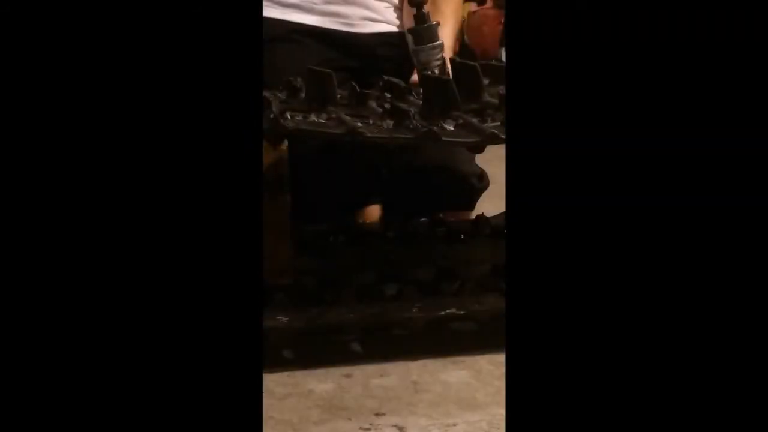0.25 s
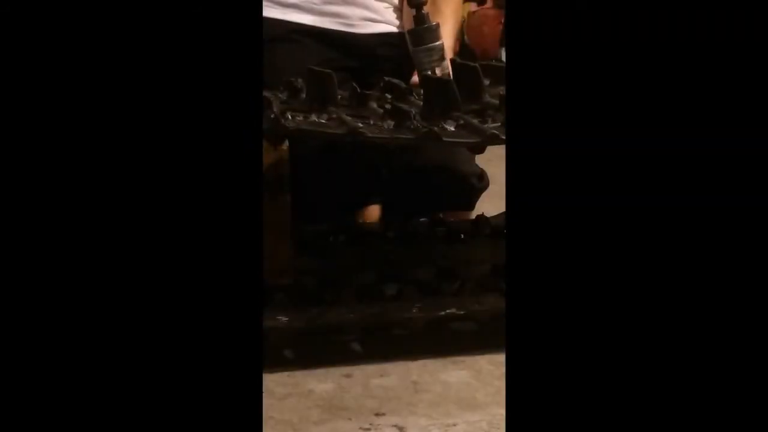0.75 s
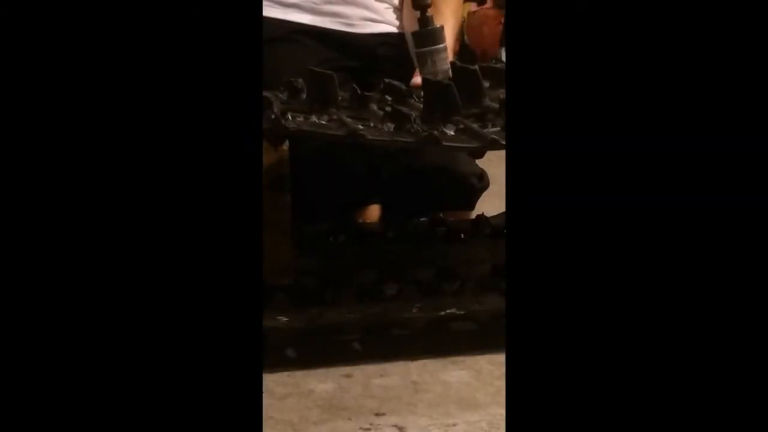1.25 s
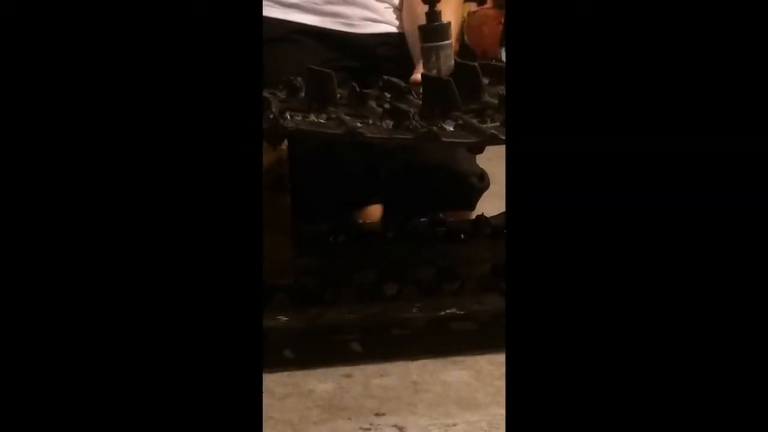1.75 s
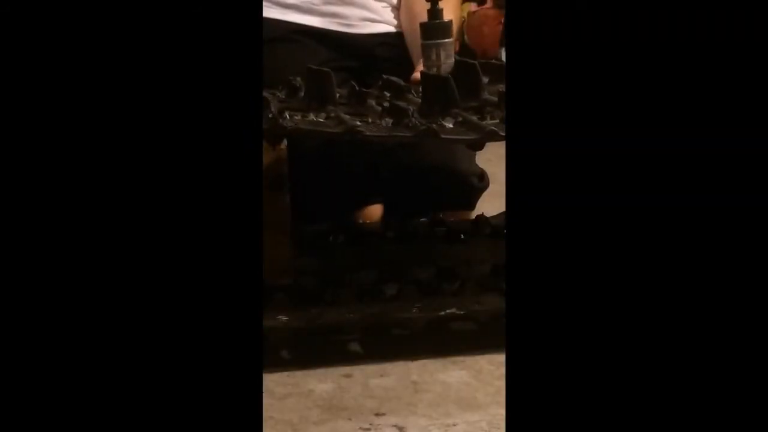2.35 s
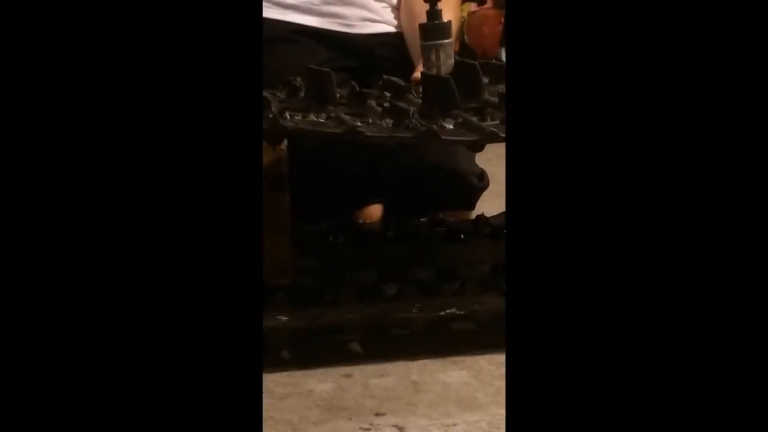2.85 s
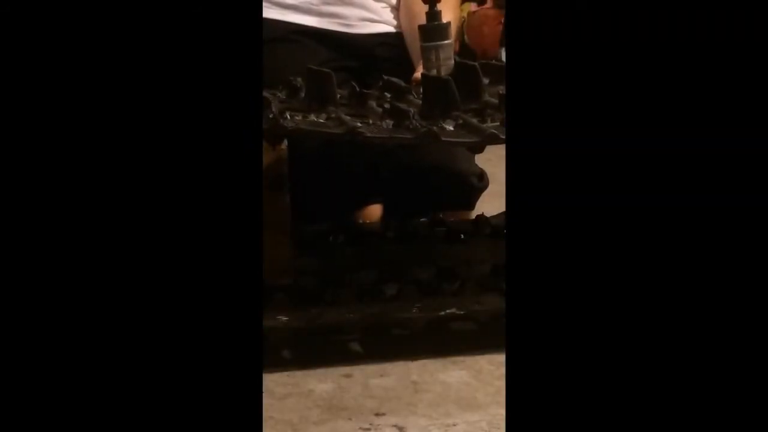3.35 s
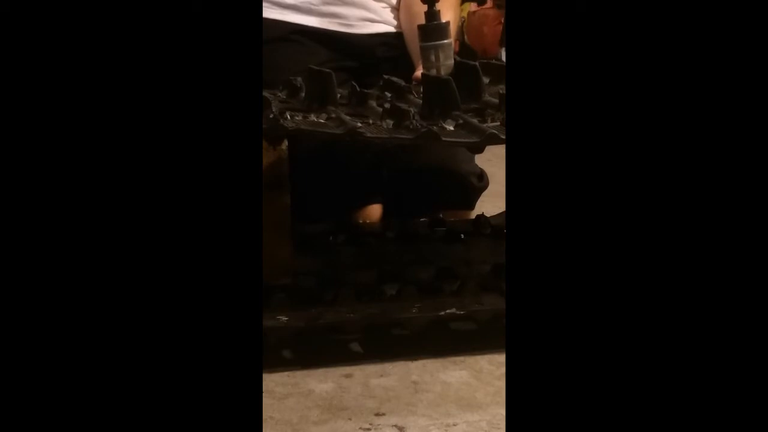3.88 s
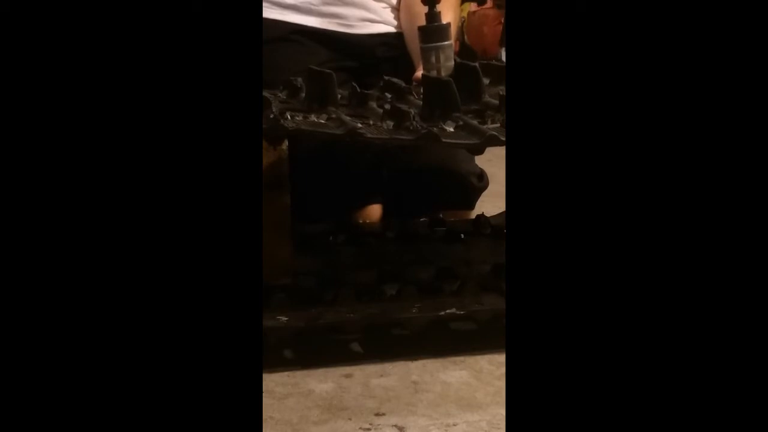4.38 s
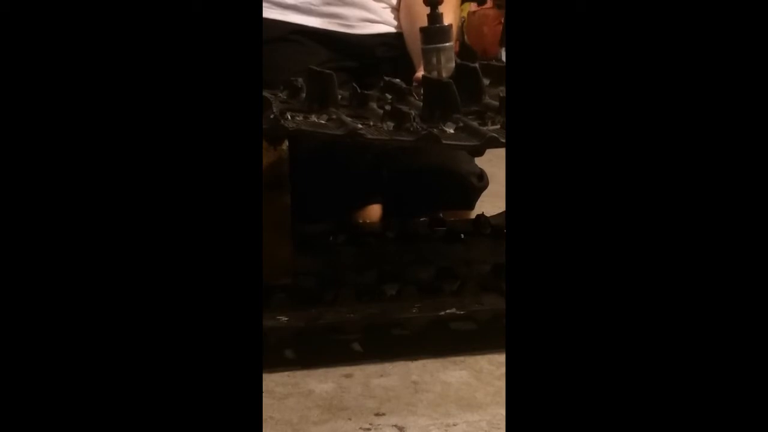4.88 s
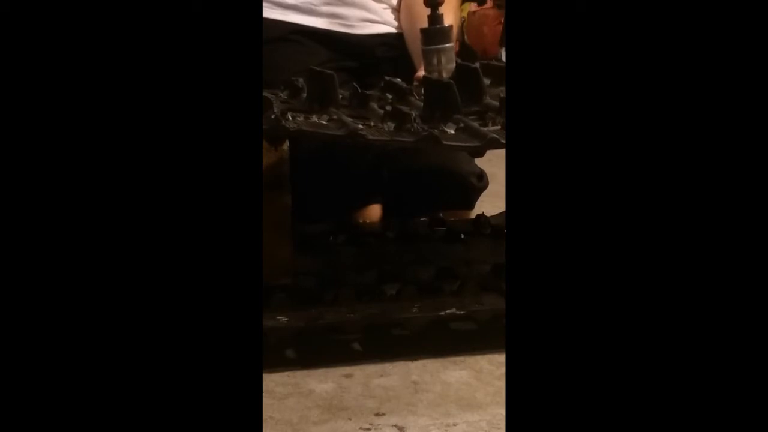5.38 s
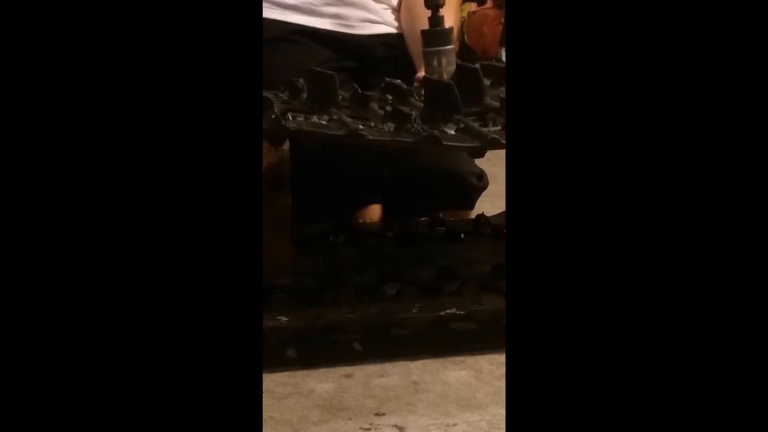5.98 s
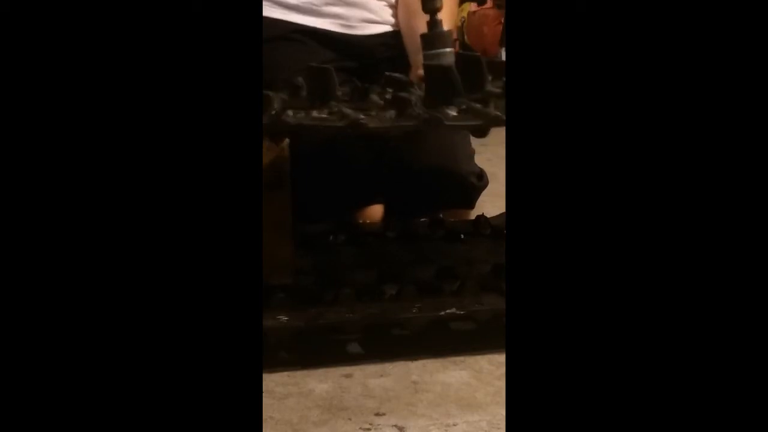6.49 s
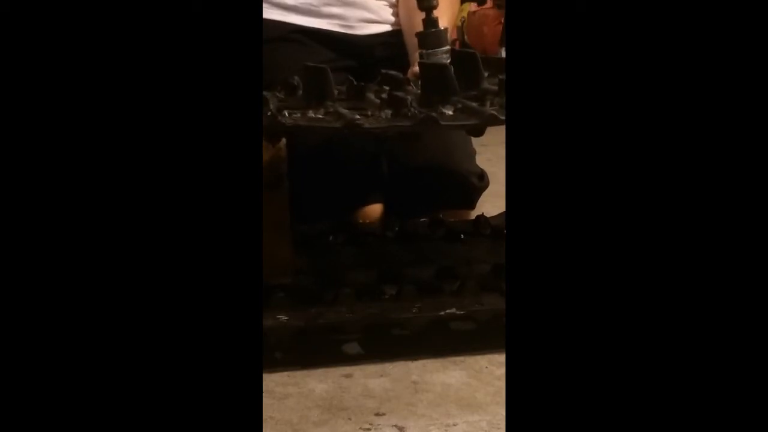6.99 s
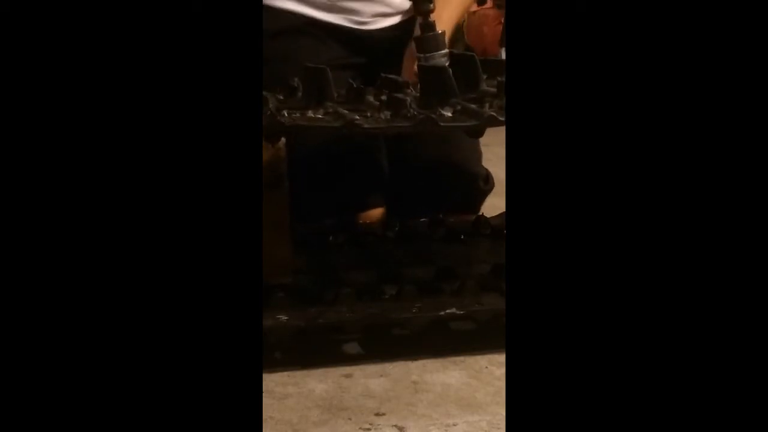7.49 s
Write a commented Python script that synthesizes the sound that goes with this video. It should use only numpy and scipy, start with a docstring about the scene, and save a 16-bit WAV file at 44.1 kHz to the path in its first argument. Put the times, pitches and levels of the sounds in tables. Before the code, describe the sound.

Close to the microphone in a moderately live workshop, a mains drill creeps with buzzing, irregular gear knocks, then grinds through thick rubber with a hole saw. The rattle thickens and the pitch climbs in steps to a loud whine with a rush of fan air. The saw breaks through with a dull thump, the drill winds down quickly, and a small clack ends it over low hum and faint hiss.

```python
"""At a light trigger a mains drill's gears knock once per mains cycle, close by in a workshop.
The knocks merge into a rattle of gear and saw teeth, made of coloured noise grains, as a hole saw cuts thick rubber.
The motor steps up to a whine: sines at multiples of one shaft speed, shaped by the parts that radiate them.
The saw breaks through with a thump of filtered noise, the drill coasts to rest, and the tool gives a last clack.
The room's tail follows every sound of the drill, over a steady bed of drone, rumble, hiss and trill."""
import sys
import numpy as np
from scipy import signal
from scipy.fft import rfft, irfft, next_fast_len
from scipy.io import wavfile
from scipy.ndimage import map_coordinates

SR = 44100
rng = np.random.default_rng(int(sys.argv[2]) if len(sys.argv) > 2 else 0)


def to_wav(sig):
    """Store sig (one row per channel, or 1-D mono) as 16-bit WAV at the path in sys.argv[1].

    Samples outside -1..1 are clipped; the rate is SR.
    """
    pcm = np.clip(np.atleast_2d(sig), -1, 1) * 32767
    pcm = np.round(pcm).astype(np.int16)
    wavfile.write(sys.argv[1], SR, pcm.T)  # frames by channels


N = 341025
TIME = np.arange(N) / SR
MAINS_HZ = 60
FULL_HZ = 350  # shaft speed at which the level laws are stated
THROUGH_S, THROUGH_FADE_S = 6.41, 0.045  # the saw breaks through and the load falls away


def amp(db):
    """Decibels to amplitude."""
    return 10 ** (np.asarray(db) / 20)


def unit(x):
    """Scaled to rms 1."""
    return x / np.sqrt(np.mean(x ** 2) + 1e-20)


def along(points, hz):
    """Reads (frequency, value) points on a log frequency axis."""
    f, v = np.transpose(points)
    return np.interp(np.log(hz + 1), np.log(f + 1), v)


def curves(rows):
    """One value per sample for each column after the time."""
    s, *cols = np.transpose(rows)
    return [np.interp(TIME, s, c) for c in cols]


def wobble(rate):
    """A smooth random curve, rate knots a second."""
    knots = rng.standard_normal(int(N * rate / SR) + 4)
    return map_coordinates(knots, [TIME * rate])


def ramp(start, length):
    """Rises from 0 to 1 over length seconds."""
    return np.clip((TIME - start) / length, 0, 1)


def below(x, edge, order):
    """Near 1 under the edge, half at it, falling to 0 above it."""
    return 1 / (1 + (np.abs(x) / edge) ** order)


def filtered(x, response):
    """x times a complex response of frequency."""
    m = next_fast_len(N + SR // 4, True)
    return irfft(rfft(x, m) * response(np.fft.rfftfreq(m, 1 / SR)), m)[..., :N]


def coloured(x, spectrum, size=2048):
    """x through a causal, minimum-phase filter of unit energy with this spectrum."""
    cepstrum = irfft(np.log(amp(along(spectrum, np.fft.rfftfreq(size, 1 / SR)))))
    # folding the cepstrum forward in time makes the filter minimum phase
    cepstrum[1:size // 2] *= 2
    cepstrum[size // 2 + 1:] = 0
    kernel = irfft(np.exp(rfft(cepstrum)))
    return signal.oaconvolve(x, kernel[None] / np.linalg.norm(kernel), axes=1)[:, :N]


def via(x, body):
    """A tone swells and fades as it glides through the response of a body."""
    return filtered(x, lambda hz: amp(along(body, hz)))


def ringing(x, modes):
    """x through a bank of resonances: (frequency [Hz], width [Hz], level [dB])."""
    def response(f):
        return sum(amp(db) * 1j * f * width / (centre ** 2 - f * f + 1j * f * width)
                   for centre, width, db in modes)
    return filtered(x, response)


def noise():
    """Two unrelated white noises."""
    return rng.standard_normal((2, N))


def bursts(events, decay):
    """An envelope that jumps at each (time [s], level [dB]) and dies away."""
    kicks = np.zeros(N)
    for s, db in events:
        kicks[int(s * SR)] += amp(db)
    fall = np.exp(-1 / (decay * SR))
    return signal.lfilter([1], [1, -fall], kicks)


def grains(rate, spread_db, decay):
    """Envelope of rms 1 of many small impacts of unequal strength, rate a second."""
    draws = rng.random((int(rate * N / SR), 2))
    places = (draws[:, 0] * (N - 1)).astype(int)
    sizes = amp(-spread_db * np.log(np.maximum(draws[:, 1], .01)))
    kicks = np.bincount(places, sizes ** 2, N)
    energy = signal.lfilter([1], [1, -np.exp(-1 / (decay * SR))], kicks)
    return unit(np.sqrt(np.abs(energy)))


def mains_phase():
    """A whole number of turns at each pulse of current that the trigger lets through."""
    return 2 * np.pi * (MAINS_HZ * TIME - .68)


def through():
    """0 while the saw cuts, 1 once it spins free."""
    return ramp(THROUGH_S, THROUGH_FADE_S)


def level(law, speed):
    """A part grows louder with the logarithm of shaft speed, in dB, and may change once through."""
    full_db, slope_db, through_db = law
    return full_db + slope_db * np.log10(np.maximum(speed, 1) / FULL_HZ) + through_db * through()


# colour of the low rumble: (frequency [Hz], relative level [dB])
RUMBLE_COLOUR = [(15, -28), (25, -9.5), (43, -11.5), (104, -5), (126, -15.5), (140, -30.5), (188, -19),
                 (218, -26.5), (248, -22.5), (4000, -47.5), (5200, -92), (8800, -120)]


def rumble():
    """Low noise, partly shared between the two sides, drifts slowly in level."""
    a, b = coloured(noise(), RUMBLE_COLOUR)
    sides = np.array([a + 0.42 * b, a - 0.34 * b])
    return amp(-57.0 + 1.3 * wobble(3.65)) * sides


# swells of the drone, before the trims: (time [s], level [dB])
DRONE_SWELLS = [(0.0, -55), (1.2, -49.5), (2.22, -70.5), (2.26, -51), (5.92, -72), (6.13, -52), (7.3, -52),
                (7.34, -48.5), (7.73, -56)]


def drone():
    """A deep sine wavers in level and phase along its swells."""
    swell_db = curves(DRONE_SWELLS)[0] - 0.8 + 2.4 * wobble(8.3)
    return np.sqrt(2) * amp(swell_db) * np.sin(2 * np.pi * 48.6 * TIME + .4 * wobble(8.3))


# steady hum tones, before the background gain: (frequency [Hz], level [dB])
HUM_TONES = [(107.7, -59), (220.7, -87.5)]


def room_hum():
    """Low sines, each slightly unsteady in level and phase."""
    total = np.zeros(N)
    for hz, db in HUM_TONES:
        tone = np.sin(2 * np.pi * hz * TIME + 0.71 * wobble(7.3))
        total += np.sqrt(2) * amp(db + 1.3 * wobble(3.6)) * tone
    return total


# resonances of the high trill: (frequency [Hz], width [Hz], relative level [dB])
TRILL_MODES = [(4940, 60, -9.5), (5260, 70, -4)]


def trill():
    """Noise rings in two narrow bands, whose sum flutters."""
    tones = ringing(noise(), TRILL_MODES)
    return amp(-62.5 + 1.2 * wobble(30)) * unit(ringing(tones, [(5050, 500, 0)]))


# colour of the faint hiss: (frequency [Hz], relative level [dB])
HISS_COLOUR = [(300, -34), (1000, -2), (10500, -6.5), (15500, -11)]


def hiss():
    """Steady noise, weighted to the treble."""
    return amp(-64.0) * coloured(noise(), HISS_COLOUR)


def background():
    """The low and high layers add up, with the right side 2.4 dB quieter than the left."""
    layers = rumble() + drone() + room_hum() + trill() + hiss()
    return layers * amp(0) * np.array([[10 ** (1.2 / 20)], [10 ** (-1.2 / 20)]])


# reverberation of the workshop: (frequency [Hz], time to fall 60 dB [s])
ROOM_DECAY = [(150, 0.48), (2000, 0.46), (8000, 0.29), (15000, 0.3)]


def room(x):
    """Reflections blur into a decaying noise tail, shorter in the treble."""
    hz, t, z = signal.stft(rng.standard_normal((2, SR // 2)), SR, nperseg=256)
    fall = amp(-60 * t / along(ROOM_DECAY, hz)[:, None])
    tail = signal.istft(z * fall, SR, nperseg=256)[1]
    late = np.pad(tail, ((0, 0), (200, 0)))  # the tail starts 200 samples after the direct sound
    return signal.fftconvolve(x, late / np.linalg.norm(tail[0]), axes=1)[:, :N]


# shading of the far port: (frequency [Hz], left minus right level [dB])
PORT_SHADE = [(60, 6.5), (110, -11), (200, 4.5), (380, 3.5), (700, 1), (1290, -1.5), (2380, 4.5), (4400, 6),
              (8120, 19.5), (15000, 10.5)]
# how much the ports share: (frequency [Hz], left-right likeness [0 to 1])
PORT_LIKENESS = [(100, 0.96), (350, 0.97), (1000, 0.95), (2500, 0.76), (8000, 0.047)]


def ports(pair):
    """The far microphone port hears the drill later, shaded, and partly by other paths."""
    lag = 14 / SR

    def paths(hz):
        alike = np.clip(along(PORT_LIKENESS, hz), 0, 1)
        direct = alike * np.exp(-2j * np.pi * hz * lag)
        other = np.sqrt(1 - alike ** 2)
        return amp(-along(PORT_SHADE, hz)) * np.array([direct, other])

    return np.array([pair[0], filtered(pair, paths).sum(0)])


# the tool bumps in the hole: (time [s], clack level [dB], thump relative to clack [dB]), before the mix
BUMPS_IN_HOLE = [(6.415, -14, 3.5), (7.028, -45, -20), (7.618, -34, 3), (7.626, -28, -5), (7.635, -31, -3)]
# colour of the tool's clack: (frequency [Hz], relative level [dB])
CLACK_COLOUR = [(88, -30), (150, -5), (409, -5), (601, -10), (1050, -12), (1250, -23), (1770, -1),
                (3150, -5), (4290, -16), (8250, -16), (15000, -28)]
# colour of the rubber's thump: (frequency [Hz], relative level [dB])
THUMP_COLOUR = [(90, -39), (170, -28), (250, -5), (400, -10), (1000, -11), (3000, -59)]


def bumps():
    """The tool clacks and the rubber answers with a dull thump that dies away more slowly."""
    clacks = [(s, db) for s, db, _ in BUMPS_IN_HOLE]
    thumps = [(s, db + low) for s, db, low in BUMPS_IN_HOLE]
    clack = coloured(bursts(clacks, decay=0.0042) * noise(), CLACK_COLOUR)
    thump = coloured(bursts(thumps, decay=0.014) * noise(), THUMP_COLOUR)
    return clack + amp(-16) * thump


# the hardest knocks of the gears at low speed, before the trim: (time [s], level [dB])
HARD_KNOCKS = [(0.0733, -34), (0.0945, -32), (0.2108, -24.5), (0.257, -23.5), (0.3097, -30), (0.39, -24),
               (0.41, -22.5), (0.528, -35), (0.5435, -25), (0.5575, -26.5), (0.5935, -23.5), (0.657, -27),
               (0.695, -23), (0.7256, -20.5), (0.742, -19), (0.7758, -24.5), (0.826, -23), (0.8914, -20.5),
               (1.09, -20), (1.177, -16)]
# colour of a knock: (frequency [Hz], relative level [dB])
KNOCK_COLOUR = [(150, -19.5), (900, -1.5), (1700, -9), (3000, 3), (4300, -10), (6000, -2.5), (9000, -1.5),
                (13000, -14), (15500, -21)]
# lesser knocks: until when, first level (before the trim), growth, scatter
CREEP_S, CREEP_DB, CREEP_RISE_DB_PER_S, CREEP_SPREAD_DB = 1, -43, 6.5, 6


def knocks():
    """While the motor creeps, each pulse of current knocks the gears, now and then hard."""
    first_pulse = -mains_phase()[0] / (2 * np.pi * MAINS_HZ)
    times = np.arange(4, CREEP_S * MAINS_HZ) / MAINS_HZ + first_pulse
    scatter_db = CREEP_SPREAD_DB * rng.standard_normal(len(times))
    sizes_db = CREEP_DB + CREEP_RISE_DB_PER_S * times + scatter_db
    strikes = bursts([*HARD_KNOCKS, *zip(times, sizes_db)], decay=.003)
    return amp(-3.0) * coloured(strikes * noise(), KNOCK_COLOUR)


# how the housing passes on the armature's whine: (frequency [Hz], level [dB])
SLOT_RESPONSE = [(900, -60.5), (1900, -40.5), (2300, -34.5), (2450, -31.5), (2690, -22.5), (2980, -23),
                 (3320, -37)]


def slot_whine(rotor, jerk):
    """Ten armature slots pass the poles each turn; the pulses of current modulate their tone."""
    pulsed = 1 + .85 * jerk * np.cos(mains_phase() - .7)
    tone = np.sin(10 * rotor + (.8 - .4 * jerk) * wobble(200))
    # once through, the whine drops by 2 dB
    return amp(-2 * through()) * via(pulsed * amp(2.2 * wobble(40)) * tone, SLOT_RESPONSE)


# how the vents pass on the fan's blade tone: (frequency [Hz], level [dB])
FAN_RESPONSE = [(1400, -63), (2950, -46), (3170, -38), (3620, -45.5), (3820, -45), (5800, -34), (7000, -30)]


def fan_whine(turn):
    """Twenty fan blades pass the vents each turn."""
    tone = np.sin(20 * turn + .5 * wobble(120))
    return via(amp(2.5 * wobble(25)) * tone, FAN_RESPONSE)


# how the rubber slab passes on the shaft's hum: (frequency [Hz], level [dB])
SLAB_RESPONSE = [(110, -79), (190, -58.5), (225, -58.5), (256, -43), (318, -41), (349, -29.5)]


def shaft_hum(turn):
    """Unbalance shakes the slab once a turn."""
    hum = via(amp(.8 * wobble(8)) * np.sin(turn), SLAB_RESPONSE)
    return amp(4 * through()) * hum  # once through, the loose tool shakes 4 dB more


# a low throb in mid-cut: middle, half length, level
THROB_S, THROB_LENGTH_S, THROB_DB = 4.82, 0.4, -56.5


def throb(turn):
    """A tone at a third of the shaft rate swells and fades."""
    swell = amp(THROB_DB) * below(TIME - THROB_S, THROB_LENGTH_S, order=6)
    return swell * amp(2 * wobble(15)) * np.sin(turn / 3 + .5 * wobble(20))


def mesh(turn, orders, rough):
    """Gear whine of rms 1: multiples of the shaft angle, each unsteady in strength and phase."""
    total = np.zeros(N)
    for multiple, db in orders:
        total += amp(db + 1.9 * wobble(50)) * np.sin(multiple * turn + rough * wobble(130))
    return unit(total)


# pinion under load: (multiple of the shaft rate, relative level [dB])
LOADED_ORDERS = [(2, -6), (4, 11), (6, -14), (16, -6)]
# how the gear case passes on the loaded pinion's whine: (frequency [Hz], level [dB])
GEAR_RESPONSE = [(280, -72.5), (370, -54), (480, -56.5), (620, -62), (770, -48.5), (970, -36.5),
                 (1290, -31), (1420, -33)]


def loaded_gears(rotor):
    """The four teeth of the pinion press on the gear and whine through the gear case."""
    return via(mesh(rotor, LOADED_ORDERS, rough=1.0), GEAR_RESPONSE)


# pinion and armature running free: (multiple of the shaft rate, relative level [dB])
FREE_ORDERS = [(4, 2.5), (8, -13), (9, -7), (10, -1.5), (11, -5), (12, -4)]
# free whine: (level at FULL_HZ [dB], slope [dB per tenfold speed], change once through [dB]), before the case
FREE_LAW = (-21, 35, 0)


def free_gears(turn, speed):
    """Without load the pinion and armature whine at multiples of the shaft rate."""
    unloaded = ramp(THROUGH_S - .02, .03)
    whine = unloaded * amp(level(FREE_LAW, speed)) * mesh(turn, FREE_ORDERS, rough=.55)

    # the small gear case radiates mainly between its first and last strong resonance
    def case(hz):
        return (1 - below(hz, 830, order=8)) * below(hz, 3200, order=14)

    return filtered(whine, case)


# the rotor's momentum smooths the jerks above this speed; swing of a jerk
JERK_FADE_HZ, JERK_RAD = 328, 0.25


def motor(speed):
    """The turning angle of one shaft drives hum, slots, fan and gears."""
    turn = 2 * np.pi * np.cumsum(speed * (1 + .0012 * wobble(30))) / SR
    load = 1 - through()
    # each pulse of current jerks the rotor, which splits the whine into lines a mains frequency apart
    jerk = load * below(speed, JERK_FADE_HZ, order=8)
    rotor = turn + JERK_RAD * jerk * np.sin(mains_phase())
    tones = shaft_hum(turn) + slot_whine(rotor, jerk) + load * fan_whine(turn) + throb(turn)
    gears = load * loaded_gears(rotor) + free_gears(turn, speed)
    return np.array([np.sqrt(2) * tones + gears, np.zeros(N)])


PULSING_HZ = 97.4  # speed at which half of the rattle still follows the mains pulses


def drive_force(speed):
    """At low speed under load the force follows the mains pulses; faster, it evens out."""
    share = below(speed, PULSING_HZ, order=4) * (1 - through())
    pulse = unit(np.exp(1.03 * np.cos(mains_phase())) * amp(1.6 * wobble(60)))
    flicker = amp(0.11 * wobble(22) + 0.16 * wobble(90))
    return np.sqrt(1 - share + share * pulse ** 2) * flicker


# saw cup modes: (frequency [Hz], width [Hz], relative level [dB])
CUP_MODES = [(3595, 24, -2.5), (4878, 18, .5), (5600, 220, -21), (8080, 150, -11), (8880, 140, -14),
             (9815, 25, -8), (11450, 160, -9)]
# ring relative to the mean of treble and casing levels; change once through
CUP_DB, CUP_THROUGH_DB = -4, -13.5
SHIMMER_HZ = 115  # above this speed the teeth also excite the cup's high modes


def saw_cup(speed, drive, mean_db):
    """The cup rings in swells, and hardly at all once through."""
    shimmer = 1 - below(speed, SHIMMER_HZ, order=4)
    low_modes = ringing(drive * noise(), CUP_MODES[:2])
    high_modes = ringing(drive * noise(), CUP_MODES[2:])
    swells_db = 2.3 * wobble(14)
    ring_db = mean_db + CUP_DB + CUP_THROUGH_DB * through() + swells_db
    return amp(ring_db) * unit(low_modes + shimmer * high_modes)


def squeak(teeth, treble_db):
    """The teeth squeak in brief spurts at two resonances."""
    tone = unit(ringing(teeth * noise(), [(7890, 89, 0), (8770, 280, -1)]))
    return amp(treble_db - 8.0 + 4.4 * wobble(45)) * tone


# colour of gear case and rubber: (frequency [Hz], relative level [dB])
CASING_COLOUR = [(90, -28), (200, -19), (350, -9), (600, -10), (1000, 0), (1300, -2.5), (1850, -1),
                 (2300, 2), (3400, 1), (4100, -7), (5500, -32.5), (9000, -84)]
# colour of chuck and saw cup: (frequency [Hz], relative level [dB])
STEEL_COLOUR = [(2000, -39.5), (3500, -24.5), (4200, -6), (5200, -6), (5600, -2.5), (6700, -5),
                (7300, -6.5), (7900, 0.5), (8800, -3.5), (10200, -4.5), (11500, -4.5), (12600, -17),
                (15400, -37)]
# colour of fan and brushes: (frequency [Hz], relative level [dB])
AIR_COLOUR = [(90, -38), (250, -19.5), (600, -12), (1100, -3.5), (1900, -4), (2500, -2.5), (3500, -3.5),
              (4300, -5), (6100, -3), (6600, 3), (7200, -2.5), (8000, 1), (11500, -8.5), (15400, -18)]
# level laws, before trims: (level at FULL_HZ [dB], slope [dB per tenfold speed], change once through [dB])
TREBLE_BY_SPEED = (-21, 26.4, 0.27)
CASING_BY_SPEED = (-24, 22.96, 4.2)
BITE_HZ, BITE_ORDER = 75, 9  # below this speed the teeth hardly catch; sharpness of that threshold
SKATE_DB = -5  # change in the casing's rattle while the teeth only skate
# a harder push roughens the cut: middle, half length, gain of the casing (the treble gains half)
LEAN_S, LEAN_LENGTH_S, LEAN_DB = 1.35, 0.32, 2


def rattle(speed):
    """Gear and saw teeth strike in time with the current; with speed the fan's rush grows over them."""
    bite = 1 - below(speed, BITE_HZ, order=BITE_ORDER)
    lean_db = LEAN_DB * below(TIME - LEAN_S, LEAN_LENGTH_S, order=4)
    treble_db = level(TREBLE_BY_SPEED, speed) + 20 * np.log10(bite + 1e-6) + lean_db / 2
    casing_db = level(CASING_BY_SPEED, speed) + SKATE_DB * (1 - bite) + lean_db
    drive = drive_force(speed)
    teeth = drive * grains(rate=1400, spread_db=2.0, decay=0.001)
    rush = drive * grains(rate=2800, spread_db=-0.5, decay=0.0005)
    casing = amp(casing_db) * coloured(teeth * noise(), CASING_COLOUR)
    steel = amp(treble_db + 0.5 + 0.27 * wobble(28)) * coloured(teeth * noise(), STEEL_COLOUR)
    air = amp(treble_db + 6.5) * coloured(rush * noise(), AIR_COLOUR)
    fan = np.clip(0.65 * (speed / FULL_HZ) ** 5, 0, .95)  # the fan's share of the power
    struck = np.sqrt(1 - fan) * (casing + steel)
    cup = saw_cup(speed, drive, (treble_db + casing_db) / 2)
    return struck + np.sqrt(fan) * air + cup + squeak(teeth, treble_db)


# shaft speed on a light trigger: (time [s], speed [Hz])
LIGHT_SPEED = [(0.0, 60.3), (0.24, 59.9), (0.52, 68.7), (0.59, 82.1), (0.8, 100), (1.19, 91.6),
               (1.9, 125.2), (2.12, 154.2), (2.7, 182.1), (3.64, 189), (3.82, 221.6), (4.29, 238.2),
               (4.8, 242.6)]
# shaft speed as the trigger is pulled home: (time [s], speed [Hz])
FULL_SPEED = [(5.0, 239.8), (5.218, 262.3), (5.314, 297.4), (5.4, 319.8), (5.552, 338.5), (5.95, 351.2),
              (6.41, 332.3)]
# once through, it coasts to rest, with one more touch of the trigger: (time [s], speed [Hz])
COASTING_SPEED = [(6.47, 266), (6.559, 228), (6.68, 245.5), (6.75, 197), (6.85, 140), (7.051, -3.5)]
START_FADE_S = 0.045  # the drill takes this long to start sounding
REST_S, REST_FADE_S = 6.943, 0.18  # its noise has died by REST_S, as the shaft comes to rest


def scene():
    """One shaft speed drives the rattle and the whine; the workshop answers."""
    speed, = curves([*LIGHT_SPEED, *FULL_SPEED, *COASTING_SPEED])
    turning = ramp(0, START_FADE_S) - ramp(REST_S - REST_FADE_S, REST_FADE_S)
    hits = bumps()
    whine = ports(turning * motor(speed))
    clatter = ports(turning * rattle(speed) + knocks())
    to_room = amp(-4.5) * clatter + amp(-5) * hits + amp(-15) * whine
    return background() + room(to_room) + hits + whine + clatter


TOP_HZ = 15850  # band limit


def record(dry):
    """The highest peaks are rounded off and nothing above the band limit passes."""
    rounded = dry / (1 + np.abs(dry / .85) ** 6) ** (1 / 6)
    return filtered(rounded, lambda hz: hz < TOP_HZ)


dry = scene()
out = record(dry)
to_wav(out)
```